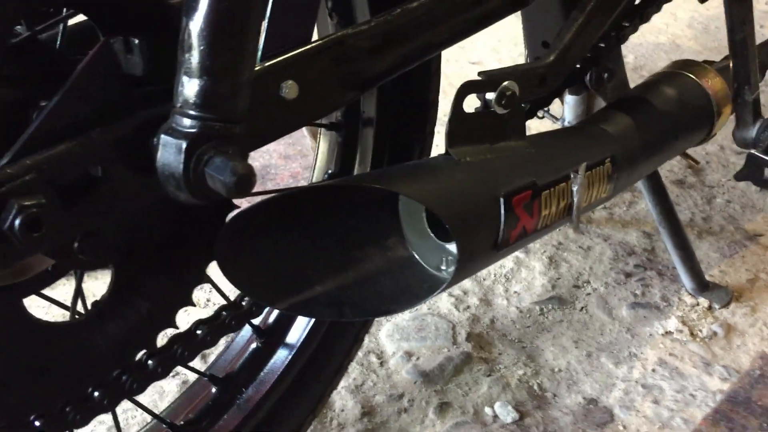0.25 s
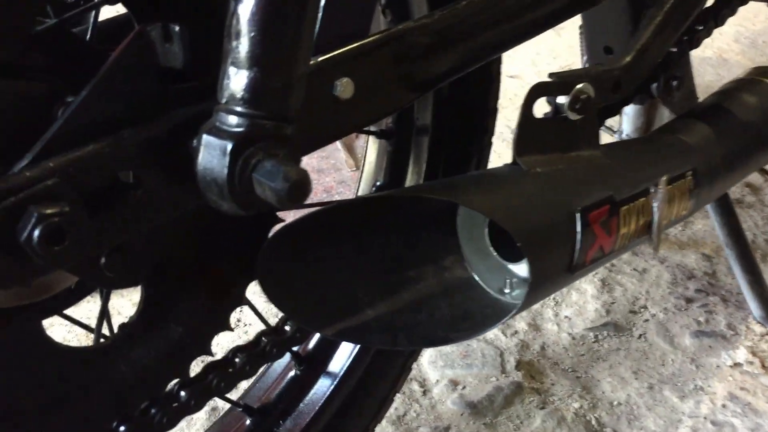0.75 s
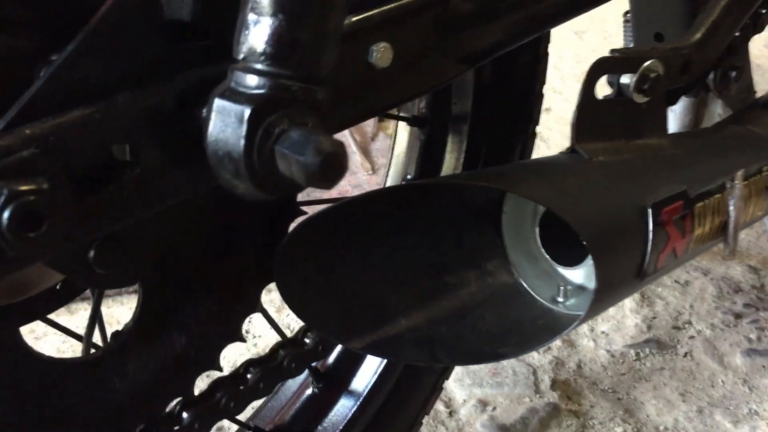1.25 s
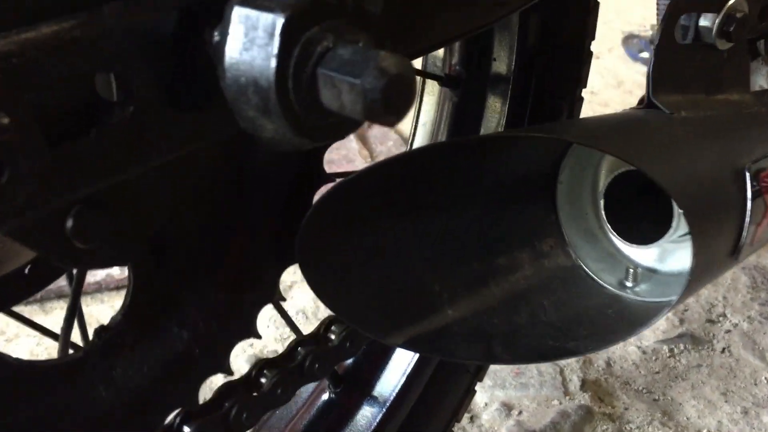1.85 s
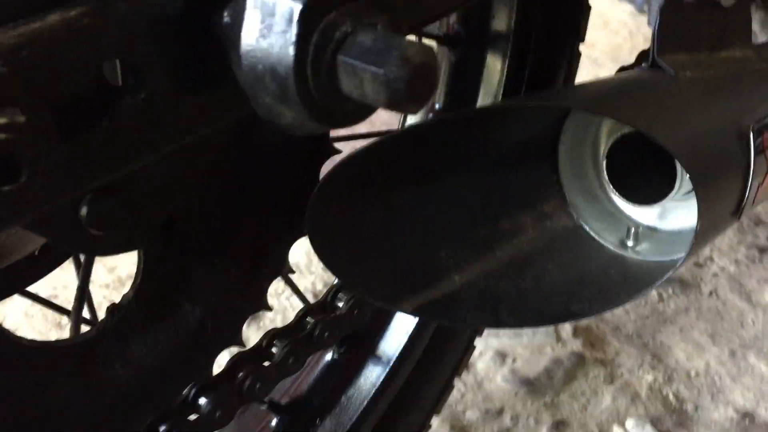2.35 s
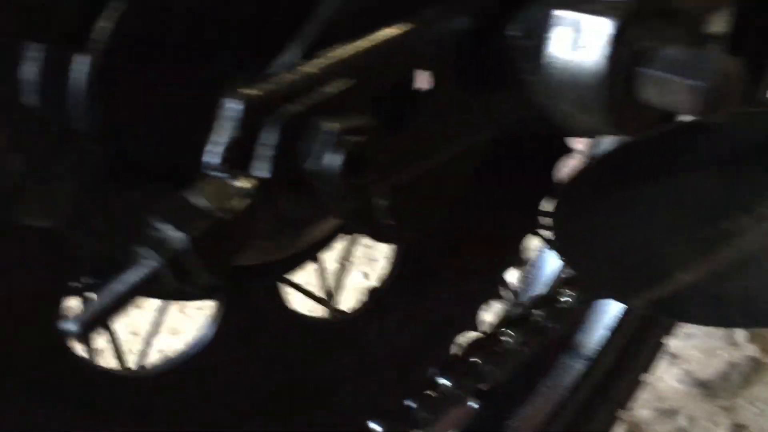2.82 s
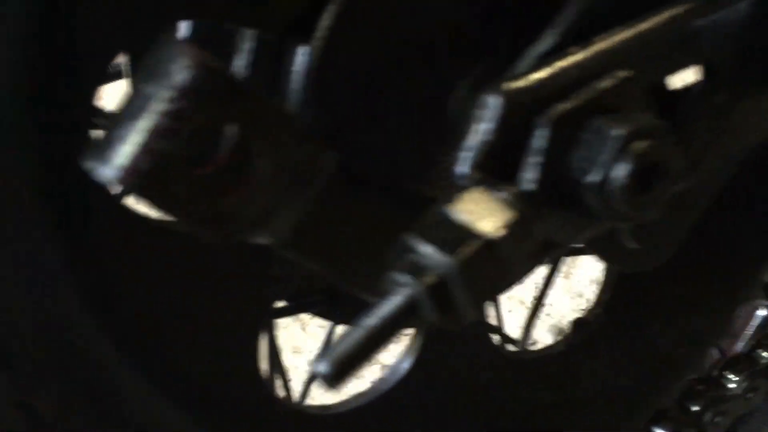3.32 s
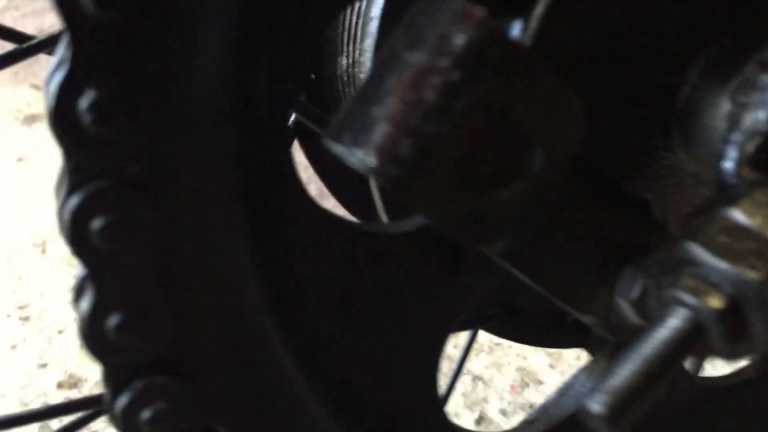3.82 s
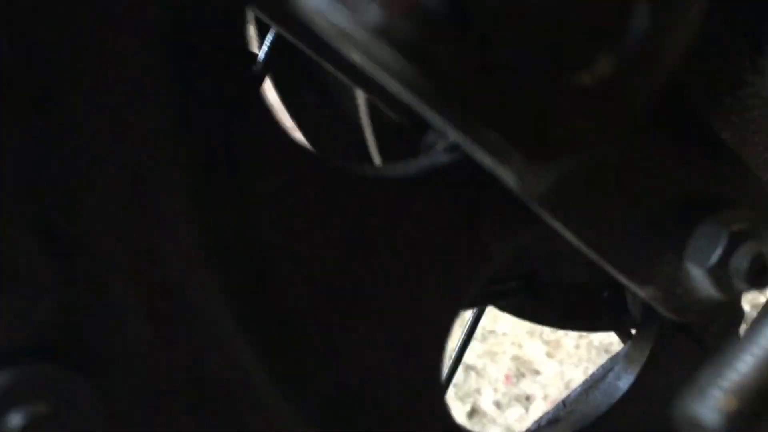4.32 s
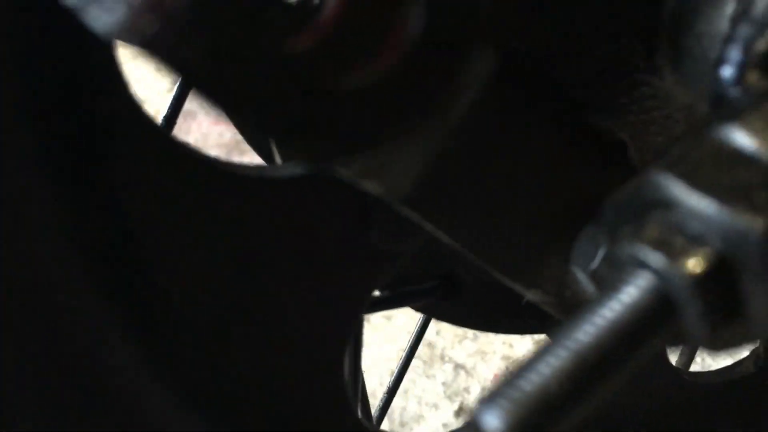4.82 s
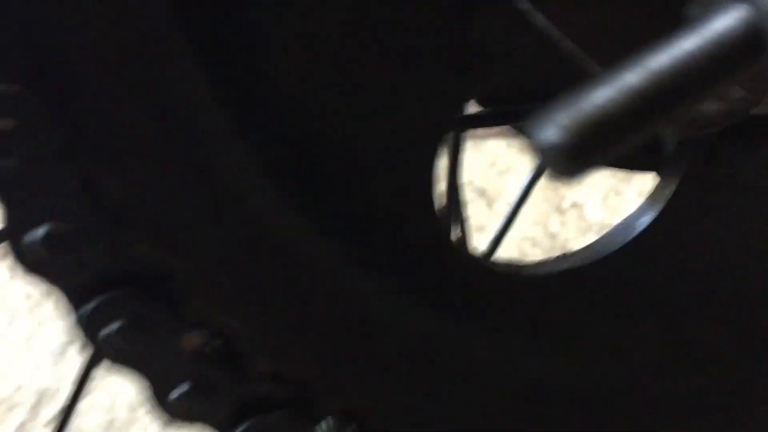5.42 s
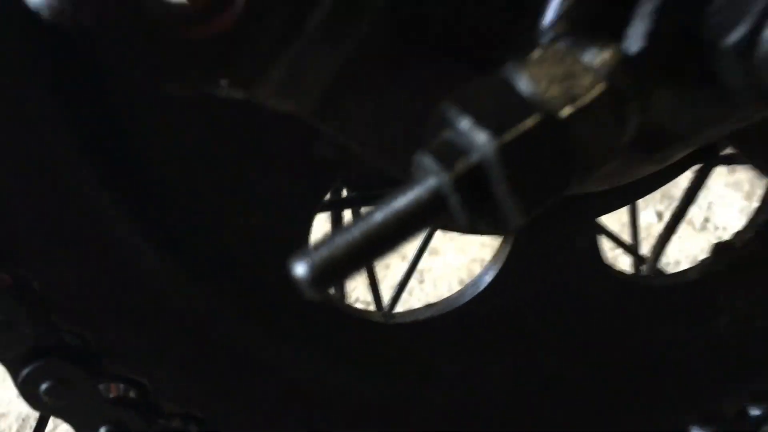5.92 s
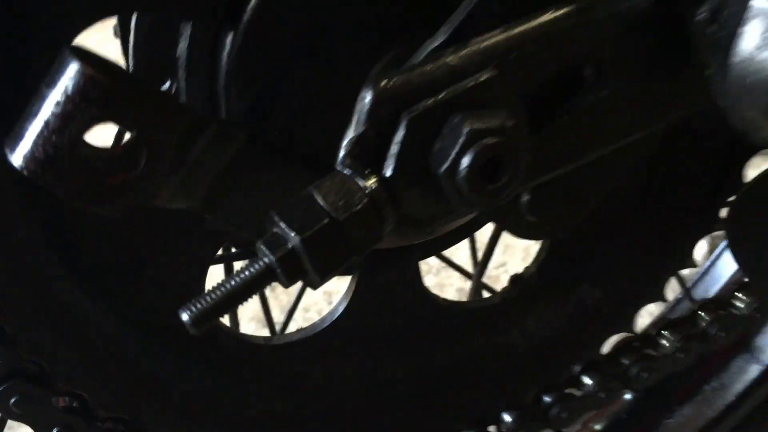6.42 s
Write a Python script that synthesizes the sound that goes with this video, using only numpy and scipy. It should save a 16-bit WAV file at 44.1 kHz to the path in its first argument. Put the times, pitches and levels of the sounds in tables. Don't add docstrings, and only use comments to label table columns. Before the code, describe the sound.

A small two-stroke moped engine idles unevenly in a garage, already running at the start. Rapid low thuds never stop; irregular stronger firings add short, hollow metallic pops and hissing spits, with weak or missed beats between. Piston and gear clatter fills the gaps. The handheld microphone moves from behind the silencer to its side, making the hiss brighter and the ring drier. Faint short wall echo.

```python
import sys
import numpy as np
from scipy import signal
from scipy.fft import rfft, irfft
from scipy.io import wavfile
from scipy.ndimage import uniform_filter1d

SR = 44100
rng = np.random.default_rng(int(sys.argv[2]) if len(sys.argv) > 2 else 0)


def how_loud(loudness_db):
    steps = np.asarray(loudness_db, float) / 20
    return 10 ** steps


def wrap_up_sound(samples):
    columns = np.atleast_2d(samples).T
    tamed = np.clip(columns, -1, 1)
    steps = np.round(tamed * 32767).astype(np.int16)
    wavfile.write(sys.argv[1], SR, steps)


N = 293706

# (time [s], burns [count], first burn level [dB],
# stumble level [dB], -26 = dead)
BOUTS = [(0.0217, 1, -3.4, -11.1), (0.0749, 1, -2.4, -26.0), (0.1292, 1, -3.0, -26.0),
         (0.2128, 1, -1.5, -9.3), (0.267, 1, -1.7, -9.6), (0.3205, 1, -1.8, -26.0),
         (0.3747, 2, -5.8, -26.0), (0.4564, 4, -9.6, -26.0), (0.5877, 2, -6.1, -7.8),
         (0.6658, 1, -1.0, -26.0), (0.7183, 2, -4.2, -26.0), (0.8267, 3, -0.6, -12.6),
         (0.9337, 1, -4.0, -26.0), (0.9874, 4, -6.3, -26.0), (1.1249, 3, -18.9, -26.0),
         (1.2608, 1, -0.3, -26.0), (1.3154, 2, -0.2, -13.6), (1.3942, 2, -1.1, -17.2),
         (1.4736, 1, -1.7, -26.0), (1.5276, 3, -8.2, -26.0), (1.6351, 5, -9.0, -26.0),
         (1.8202, 2, -0.6, -26.0), (1.9017, 2, -1.2, -16.0), (1.9819, 2, -2.2, -26.0),
         (2.0607, 2, -14.7, -26.0), (2.1445, 1, -0.5, -11.1), (2.2006, 2, -2.7, -19.3),
         (2.2838, 2, -3.4, -26.0), (2.391, 2, 0.0, -26.0), (2.4998, 1, 0.0, -26.0),
                 (2.556, 2, -0.5, -7.2), (2.6368, 2, -4.7, -26.0), (2.7481, 3, -0.7, -7.1),
                 (2.8834, 2, -12.4, -26.0), (2.9664, 2, -4.4, -26.0), (3.0491, 1, -0.4, -7.0),
                 (3.1295, 2, -7.3, -7.3), (3.2112, 1, -6.8, -26.0), (3.2674, 2, -5.9, -11.9),
                 (3.3547, 1, -4.5, -26.0), (3.4127, 2, -1.7, -26.0), (3.5004, 3, -2.0, -26.0),
                 (3.6146, 1, -3.3, -13.4), (3.671, 1, -1.2, -26.0), (3.7282, 3, -0.7, -9.1),
                 (3.8423, 2, -5.7, -7.3), (3.9226, 1, -8.2, -16.6), (3.9772, 1, -2.5, -13.5),
                 (4.0309, 1, -0.8, -12.2), (4.0855, 1, -4.2, -26.0), (4.1398, 3, -16.6, -26.0),
                 (4.2505, 2, -7.3, -26.0), (4.333, 2, -13.4, -18.1), (4.4159, 5, -0.4, -7.0),
         (4.5758, 3, -3.3, -26.0), (4.6806, 6, -11.4, -26.0), (4.8625, 2, -8.9, -26.0),
                (4.9437, 2, -3.8, -26.0), (5.0558, 2, -1.3, -12.9), (5.1357, 1, -2.3, -9.5),
                (5.1883, 2, -1.9, -7.7), (5.2697, 1, -3.3, -9.7), (5.3845, 1, -2.6, -26.0),
                (5.4418, 2, -9.2, -26.0), (5.5279, 1, -0.9, -26.0), (5.5837, 2, -0.4, -8.1),
                (5.6649, 4, -3.3, -26.0), (5.797, 2, -1.2, -26.0), (5.9049, 1, -0.8, -11.5),
                (5.96, 2, -1.8, -26.0), (6.0407, 1, -1.2, -16.2), (6.0951, 3, -2.4, -19.2),
                (6.2001, 1, -3.6, -7.3), (6.2515, 1, -1.8, -26.0), (6.304, 2, -10.9, -26.0),
                (6.4127, 1, -0.2, -7.5), (6.4666, 1, -2.7, -26.0), (6.5195, 4, -1.4, -6.9),
                (6.6537, 1, -5.6, -26)]
# (time [s], rise of the ring [Hz], extra jet [dB])
LOADED_BANGS = [(1.8202, 100, 0), (2.0888, 35, 1), (2.391, 80, 2), (2.4998, 110, 2.5), (3.0491, 40, 1.5),
                (3.4127, 55, 0), (3.7282, 45, 0), (4.0037, 80, 0), (4.5758, 55, 0), (5.5837, 40, 0),
                (5.9049, 90, 4)]
# (time [s], aside of the jet [0-1], shaded by the can [0-1], facing the lip [0-1])
MIC_PATH = [(0, .05, 0, .2), (.7, .01, 0, .2), (1.8, .05, .1, .3), (2.6, .35, .05, .3), (2.85, .45, .3, .5),
            (3.05, .8, .5, 1), (3.5, 1, .8, .9), (4, .85, 1, .33), (4.45, 1, .7, .4), (4.75, .55, .55, .35),
            (5.1, .6, .5, .1), (5.5, .75, .5, .03), (6, .95, .15, .8), (6.3, .65, .25, 1),
            (6.66, .65, .3, .75)]
MIC_EFFECTS = [
    (1.2, 0, -.6, -.35, .8),
    (-5.5, 0, 14, 0, -3),
    (-8, 22, 0, 0, 2),
    (-7, 3, 0, 18.5, 1),
    (-26.7, 0, 3, .3, 4.7),
    (.93, 0, 0, -.04, .5),
    (-.3, 0, 4.2, -1.5, -8),
]
RING_LENGTH, UPPER_MODES, WHISTLE_LEVEL, SIZZLE_LEVEL, CLATTER_LEVEL, BLUNTNESS, HIDDEN_BURN = range(7)
# (time after the bang [ms], rise [ms], fall [ms], size unfired [ratio], size added by the burn [ratio])
SURGES = [
    (2.05, 0.56, 0.94, -0.31, 1.22),
    (3.37, 0.7, 3.39, 0.02, 0.29),
    (8.94, 1.0, 3.23, 0.07, 0.06),
    (11.34, 1.21, 1.27, 0.17, 0.18),
    (9.82, 2.94, 2.62, -0.1, 0.46),
    (15.22, 2.57, 2.49, 0.03, 0.21),
]
# (frequency [Hz], width [Hz], level [dB])
PIPE_MODES = [(243, 59, -9.5), (320.3, 46, -11.5)]
# (frequency [Hz], level [dB], t60 [s], scatter of phase [turns])
SILENCER_MODES = [(708.5, -4.5, 0.019, 0.056), (940, 0.7, 0.025, 0.0042), (1170, -5.5, 0.016, 0.028),
                  (1590, -15.5, 0.015, 0.22), (2180, -21, 0.019, 0.4), (2680, -28.5, .01, 0.55),
                  (3180, -26.5, 0.0097, 0.19), (3500, -31, 0.013, 0.54), (1694, -22.5, .02, 0.5),
                  (594, -22, 0.011, 0.013)]
# (frequency [Hz], level per Hz [dB])
JET_SPECTRUM = [(880, -53), (1500, 5), (1970, -14), (2220, -0.5), (3700, -29), (4520, -15.5), (6230, -15),
                (8680, -16.5), (9500, -12), (12200, -24), (15500, -11), (16500, -37)]
# (frequency [Hz], width [Hz], level [dB])
WHISTLE_PEAKS = [(6140, 1200, 0.5), (6635, 470, -0.5), (3450, 370, -8)]
# (frequency [Hz], width [Hz], level [dB])
SIZZLE_PEAKS = [(9700, 170, 4), (11870, 1160, 6.5), (12970, 400, 0.5), (15000, 2000, 0)]
# (frequency [Hz], level per Hz [dB])
CLATTER_SPECTRUM = [(40, -45), (70, 6.5), (130, -2.5), (330, 9.5), (500, -7), (930, -6.7), (1200, -9.5),
                    (1400, -16), (1580, -12.5), (2100, -22.5), (3300, -24), (4130, -31.5), (8000, -36),
                    (12200, -41.5), (16500, -53)]
# (frequency [Hz], t60 [s])
GARAGE_DECAY = [(150, 1), (1000, 0.1), (4000, 0.11), (12000, 0.04)]
# (frequency [Hz], level per Hz [dB])
HAND_RUMBLE = [(20, 8), (45, -8), (70, 21), (200, -39), (400, -43)]
# (start [s], end [s], treble lost above [Hz], line left over [Hz], its level [dB])
DROPOUTS = [(.351, .363, 3000, 2600, -44), (.799, .812, 3000, 2600, -40), (.836, .855, 4000, 2900, -42),
            (2.056, 2.07, 2500, 2100, -42), (2.357, 2.368, 2300, 2100, -42),
            (2.593, 2.602, 1800, 1500, -38), (3.676, 3.687, 2600, 11700, -36),
            (3.714, 3.721, 2600, 2200, -40), (4.345, 4.354, 2600, 3500, -42),
            (4.634, 4.648, 2200, 4100, -41), (4.747, 4.761, 2600, 2200, -36),
            (4.747, 4.757, 2600, 1700, -32), (4.345, 4.354, 2600, 6500, -40),
            (5.238, 5.249, 2200, 6700, -36), (6.318, 6.336, 2200, 3550, -29),
            (6.453, 6.464, 2200, 6750, -33), (6.453, 6.464, 2200, 11600, -31),
            (6.453, 6.464, 2200, 9650, -36)]

TURN_S, COUNT_S = .0273, .0271
DEAD_DB = -26
FOLLOW_DB, FULL_DB, CLEAN_BELOW_DB, REBOUND, BURN_SCATTER_DB = -3.6, -1.3, -4.3, 1.1, .7
DRAG_PER_DB, GAIN_PER_BURN = .002, .01
ASIDE_LOSS_DB, FADE_DB = -.9, .15
LIP_SLOPE, LIP_PIVOT_DB = .55, -3
JET_DB, JET_SLOPE, JET_ASIDE_DB, JET_SCATTER_DB = -20.3, 1.4, 10.2, 1.2
RING_HZ, RING_HZ_PER_DB, RING_ASIDE_HZ, RING_SCATTER_HZ = 950, 9, 15, 16
APPROACH_S = .75


def evened(x):
    return x / np.sqrt(np.mean(x ** 2) + 1e-20)


def read(points, hz):
    f, value = np.transpose(points)
    return np.interp(np.log(hz + 1), np.log(f + 1), value)


def mic_position(s):
    time, *shares = np.transpose(MIC_PATH)
    return [np.interp(s, time, share) for share in shares]


def mic_effect(s, effect):
    base, *weights, far = MIC_EFFECTS[effect]
    moved = sum(weight * share for weight, share in zip(weights, mic_position(s)))
    return base + moved + far * np.exp(-s / APPROACH_S)


def noise(points):
    hz = np.fft.rfftfreq(N, 1 / SR)
    return evened(irfft(rfft(rng.standard_normal(N)) * how_loud(read(points, hz)), N))


def resonant_noise(peaks):
    hz = np.fft.rfftfreq(N, 1 / SR)
    gain = sum(how_loud(db) / (1 + (2 * (hz - f) / width) ** 2) for f, width, db in peaks)
    return evened(irfft(rfft(rng.standard_normal(N)) * gain, N))


def laid(s, pieces, lead):
    at = (np.round(s * SR).astype(int) - lead + np.arange(pieces.shape[1])).ravel()
    inside = (at >= 0) & (at < N)
    return np.bincount(at[inside], pieces.ravel()[inside], N)


def bout_levels(start, burns, first_db, stumble_db, count, luck):
    levels = [first_db]
    aside = mic_position(start)[0]
    for k in range(1, int(burns)):
        rebound_db = REBOUND * max(CLEAN_BELOW_DB - levels[-1], 0)
        burn_db = min(FOLLOW_DB + rebound_db, FULL_DB)
        levels.append(burn_db + ASIDE_LOSS_DB * aside - FADE_DB * k + BURN_SCATTER_DB * luck[k])
    return np.array((levels + [stumble_db] + count * [DEAD_DB])[:count])


def turns():
    rows = BOUTS
    ends = [row[0] for row in rows[1:]] + [rows[-1][0] + TURN_S]
    chance = rng.standard_normal((len(rows), 8))
    s, db, length = [rows[0][0] - TURN_S], [-8.], [TURN_S]
    for (start, burns, first_db, stumble_db), end, luck in zip(rows, ends, chance):
        count = max(round((end - start) / COUNT_S), 1)
        bout = bout_levels(start, burns, first_db, stumble_db, count, luck)
        k = np.arange(count)
        share = 1 - DRAG_PER_DB * bout - GAIN_PER_BURN * k * (k < burns)
        share = share * (end - start) / share.sum()
        s += list(start + np.cumsum(share) - share)
        db += list(bout)
        length += list(share)
    s, db = np.array(s), np.array(db)
    jet_luck, ring_luck = rng.standard_normal((len(s), 2)).T
    aside, _, facing = mic_position(s)
    dead = db <= DEAD_DB
    loaded_s, rise_hz, extra_db = np.transpose(LOADED_BANGS)
    loaded = abs(s[:, None] - loaded_s) < TURN_S / 2

    jet_db = JET_DB + JET_SLOPE * db + JET_ASIDE_DB * aside + JET_SCATTER_DB * jet_luck
    jet_db = jet_db + LIP_SLOPE * (LIP_PIVOT_DB - db) * facing + loaded @ extra_db
    hz = RING_HZ + RING_HZ_PER_DB * np.maximum(db, -7) + RING_ASIDE_HZ * aside
    hz = hz + loaded @ rise_hz + RING_SCATTER_HZ * ring_luck
    return np.array([s, db, np.where(dead, -49, jet_db), np.where(dead, 930, hz), length])[:, :, None]


def ring(s, ring_db, ring_hz):
    t = np.arange(-115, 1900) / SR
    chance = rng.standard_normal((len(s), len(SILENCER_MODES), 3))
    heat = ring_hz / 935 - 1
    main_hz = SILENCER_MODES[1][0]
    upper_db = mic_effect(s, UPPER_MODES)
    out = 0
    for k, (hz, db, t60, scatter) in enumerate(SILENCER_MODES):
        db = db + np.minimum(40 * scatter, 2.5) * chance[:, k, :1]
        db = db + 45 * heat * np.sign(hz - main_hz) * (hz < 2000)
        db = db + (upper_db - 0.32 * ring_db) * (1400 < hz < 2000)
        db = db + (1.8 * ring_db + 95 * heat) * (2400 < hz < 3400)
        db = db + 0.93 * upper_db * (hz < 650)
        db = db + 0.97 * mic_effect(s, SIZZLE_LEVEL) * (hz > 3400)
        if k == 1:
            t60 = t60 * mic_effect(s, RING_LENGTH)
        detune = 1 + 0.33 * heat + (.004 + 0.044 * scatter) * chance[:, k, 1:2]
        cycles = hz * detune * t + scatter * chance[:, k, 2:]
        out = out - how_loud(db - 60 * np.maximum(t, 0) / t60) * np.cos(2 * np.pi * cycles)
    build = np.clip((t - t[0]) / 0.0039, 0, 1) ** 0.4
    return laid(s, how_loud(1.17 * ring_db - 3.0) * out * build, lead=115)


def jet(s, jet_db):
    t = np.arange(1200) / SR
    throb = 1 + 0.44 * np.cos(2 * np.pi * 900 * (t - .0006))
    gush = np.clip(t / 0.00043, 0, 1) * how_loud(-4200 * np.maximum(t - .0022, 0)) * throb
    wisp = how_loud(-39 - 4200 * t)
    puffs = laid(s, how_loud(1.022 * jet_db - 4.0) * (gush + wisp), lead=115)

    now = np.arange(N) / SR
    colours = rng.standard_normal((len(s), 2)).T
    gusts = [laid(s, 2.2 * colour[:, None] + np.zeros(300), lead=115) for colour in colours]
    whistle = how_loud(mic_effect(now, WHISTLE_LEVEL) + gusts[0])
    sizzle = how_loud(mic_effect(now, SIZZLE_LEVEL) + gusts[1])
    hiss = how_loud(6.0) * noise(JET_SPECTRUM)
    hiss = hiss + whistle * resonant_noise(WHISTLE_PEAKS) + sizzle * resonant_noise(SIZZLE_PEAKS)
    return puffs * hiss / np.sqrt(1 + whistle ** 2 + sizzle ** 2)


def surges(s, ring_db, length):
    ms = np.arange(-300, 1200) * 1000 / SR
    felt_db = ring_db + mic_effect(s, HIDDEN_BURN)
    burn = how_loud(.415 * felt_db) * (ring_db > -25)
    blunt = mic_effect(s, BLUNTNESS)
    chance = rng.standard_normal((len(s), len(SURGES), 2))
    out = 0
    for k, (at, rise, fall, unfired, fired) in enumerate(SURGES):
        centre = at * (length / TURN_S) ** .31 + .06 * chance[:, k, :1]
        width = np.where(ms < centre, rise, fall)
        u = (ms - centre) / (width * blunt)
        size = (unfired + fired * burn) * how_loud(.4 * chance[:, k, 1:])
        out = out - size * min(rise, fall) / width * u * np.exp(.5 - u ** 2 / 2)
    return laid(s, out, lead=300)


def pipe(x):
    x = x - 0.54 * signal.lfilter(*signal.iirpeak(480, 2.5, SR), x)
    swings = [how_loud(db) * signal.lfilter(*signal.iirpeak(hz, hz / width, SR), x) for hz, width, db in PIPE_MODES]
    return x + sum(swings)


def garage(x):
    taps = np.zeros(SR // 2)
    at = np.arange(200, len(taps) - 20, 20)
    taps[at + rng.integers(0, 20, len(at))] = rng.choice([-1., 1.], len(at))
    hz, t, z = signal.stft(taps, SR, nperseg=256)
    decay = how_loud(-60 * t / read(GARAGE_DECAY, hz)[:, None])
    tail = signal.istft(z * decay, SR, nperseg=256)[1]
    return signal.fftconvolve(x, tail / np.linalg.norm(tail))[:N]


def clatter(s):
    u = np.arange(1200) / 1200
    swell_size = how_loud(1.8 * rng.standard_normal((len(s), 1)))
    swell = laid(s, swell_size * np.exp(-((u - .45) / 0.2) ** 2), lead=700)
    flutter = how_loud(2.2 * evened(uniform_filter1d(rng.standard_normal(N), size=500)))
    ticks = how_loud(2.3 * np.minimum(rng.exponential(1, N), 4)) * (rng.random(N) < 120 / SR)
    ticks = signal.lfilter([1], [1, -np.exp(-1 / (0.0045 * SR))], ticks)
    rattle = noise(CLATTER_SPECTRUM) * evened((1 + .5 * swell + 0.29 * ticks) * flutter)
    rattle = signal.sosfilt(signal.butter(2, 680, "high", fs=SR, output="sos"), rattle)
    return how_loud(mic_effect(np.arange(N) / SR, CLATTER_LEVEL)) * rattle


def dropouts(x):
    t, out, lines = np.arange(N) / SR, x.copy(), np.zeros(N)
    for start, end, edge_hz, line_hz, db in DROPOUTS:
        near = slice(round((start - .02) * SR), round((end + .02) * SR))
        treble = signal.sosfiltfilt(signal.butter(8, edge_hz, "high", fs=SR, output="sos"), out[:, near])
        inside = np.minimum(t[near] - start, end - t[near])
        out[:, near] -= np.clip(inside / .004 + 1, 0, 1) * treble
        swell = np.clip(inside / .016 + .7, 0, 1) ** 2
        lines[near] += how_loud(db - 3) * swell * np.sin(2 * np.pi * line_hz * t[near])
    return out + lines


def scene():
    s, ring_db, jet_db, ring_hz, length = turns()
    bangs = ring(s, ring_db, ring_hz) + jet(s, jet_db)
    thuds = how_loud(-0.1) * pipe(surges(s, ring_db, length))
    echo = how_loud(-21.5) * garage(bangs + 0.1 * thuds)
    return (thuds + bangs + echo + clatter(s))[None]


def band_limit(x):
    return signal.sosfilt(signal.butter(12, 16810, fs=SR, output="sos"), x)


def record(dry):
    thin = signal.sosfiltfilt(signal.butter(3, 72, "high", fs=SR, output="sos"), dry)
    thin = thin + how_loud(-65) * noise(HAND_RUMBLE)
    rounded = thin / (1 + abs(thin / 1.02) ** 5) ** (1 / 5)
    top = how_loud(-22)
    bands = [(1 - top, 15950), (top, 16750)]  # (gain, edge [Hz])
    shelf = sum(gain * signal.firwin(401, hz, window=("kaiser", 9), fs=SR) for gain, hz in bands)
    mix = dropouts(signal.oaconvolve(rounded, shelf[None], "same"))
    return band_limit(mix)


dry = scene()
out = record(dry)
wrap_up_sound(out)
```